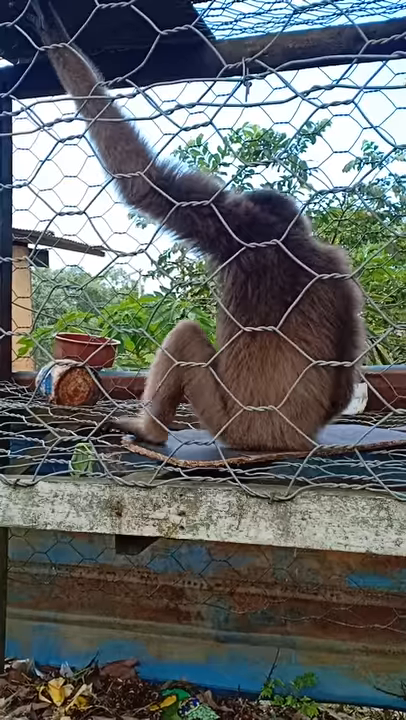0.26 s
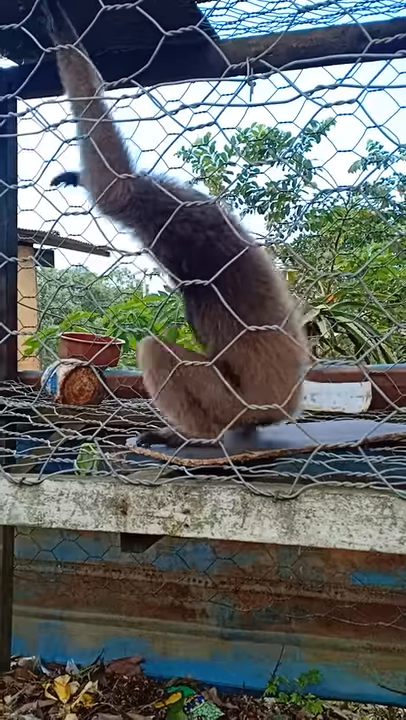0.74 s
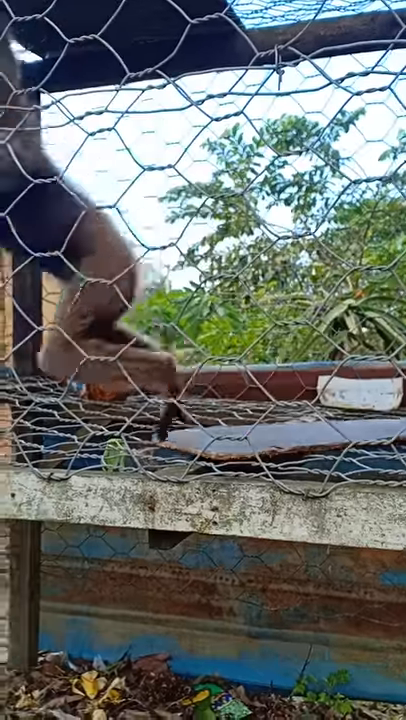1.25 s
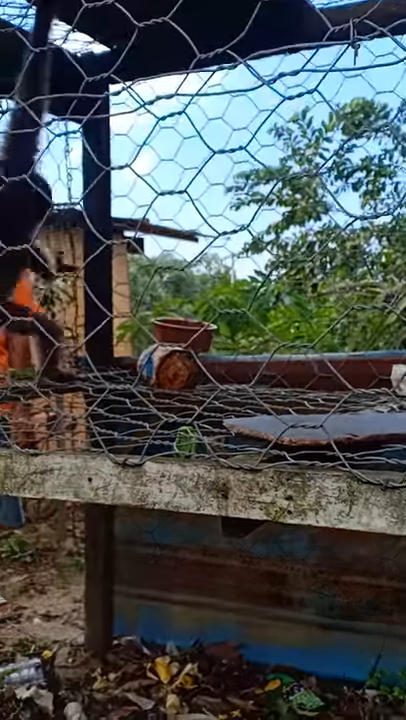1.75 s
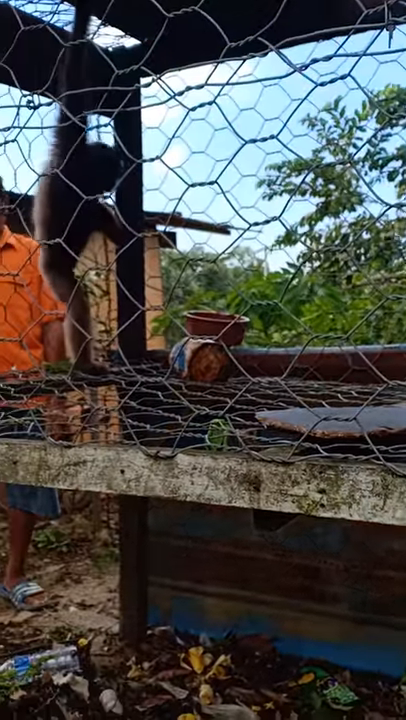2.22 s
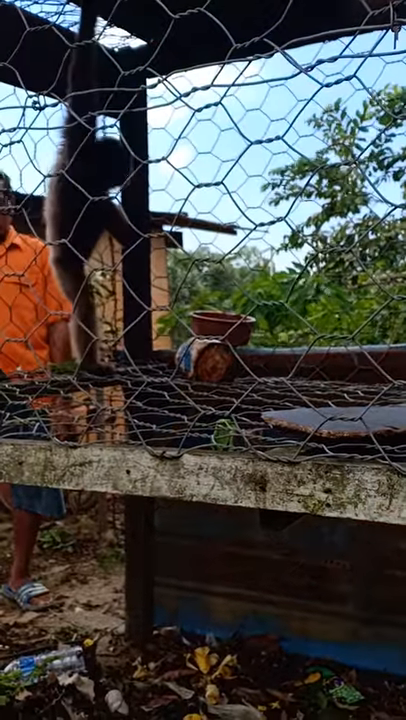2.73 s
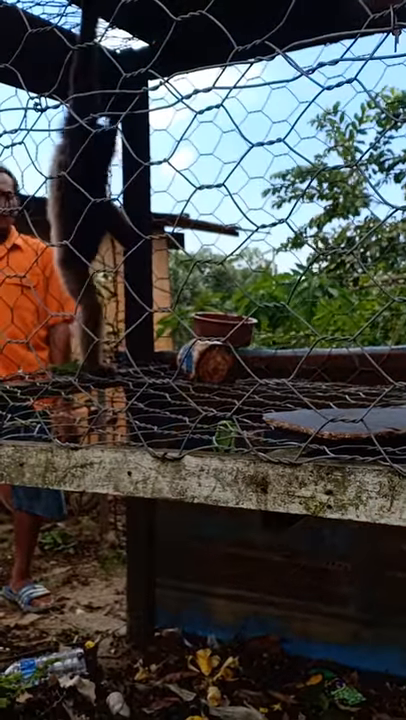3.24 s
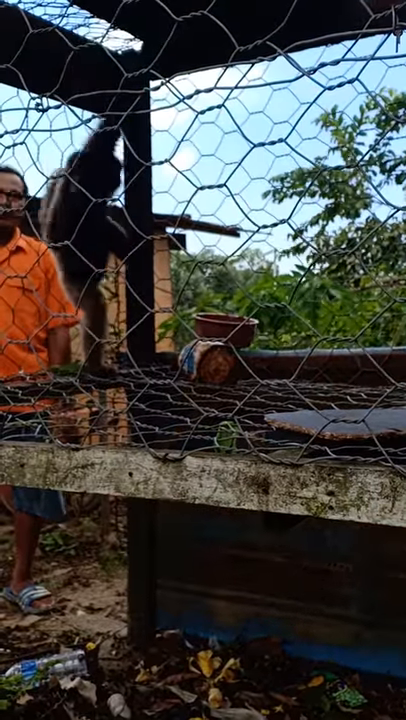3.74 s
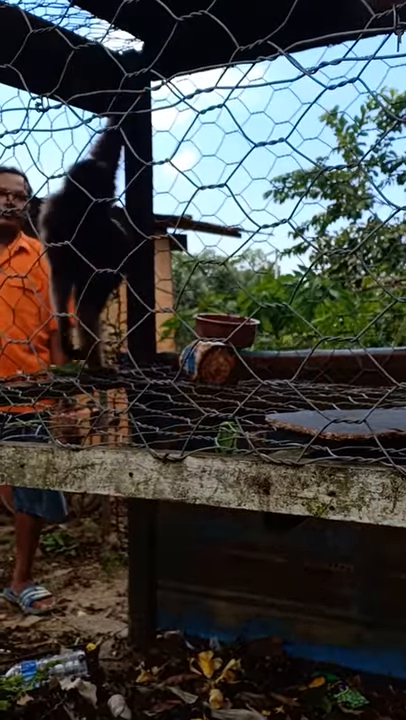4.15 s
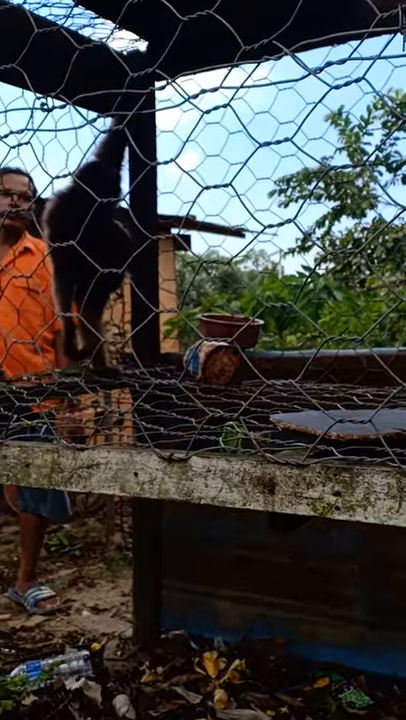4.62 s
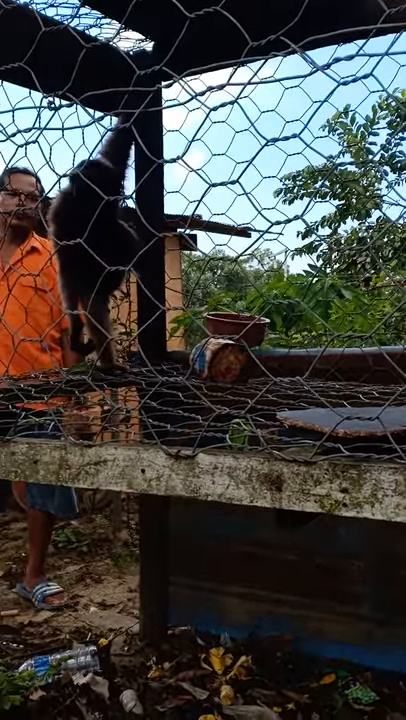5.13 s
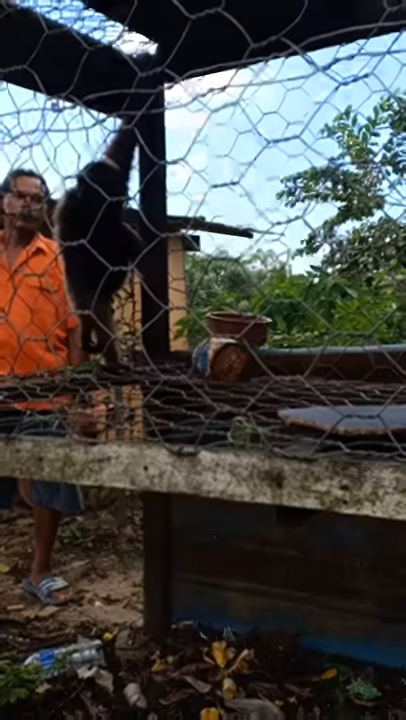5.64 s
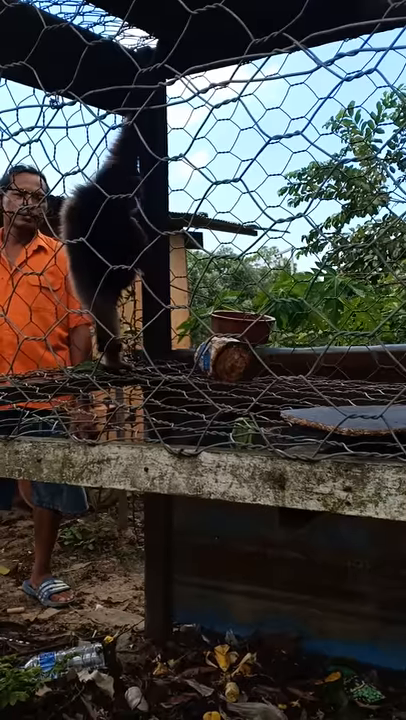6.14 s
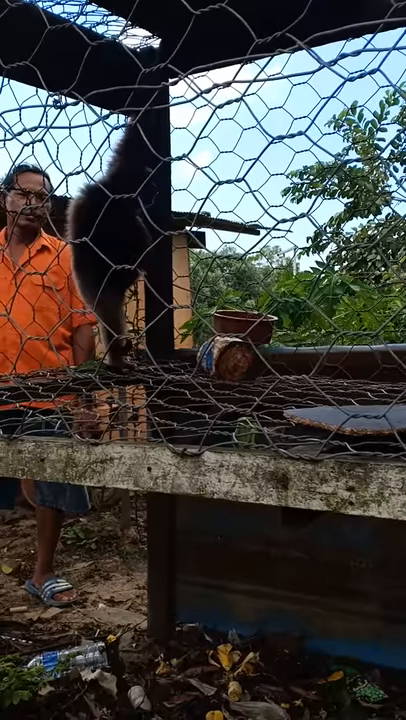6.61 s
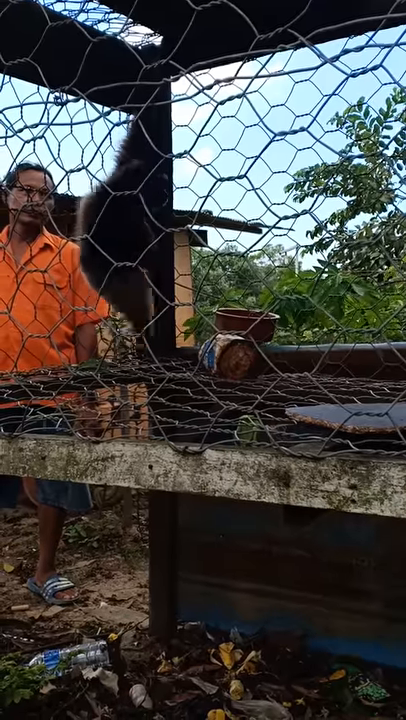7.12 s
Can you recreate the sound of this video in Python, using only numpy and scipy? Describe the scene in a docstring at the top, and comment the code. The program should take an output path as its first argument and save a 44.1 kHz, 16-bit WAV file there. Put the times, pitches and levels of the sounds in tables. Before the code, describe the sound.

A steady high insect drone, around five kilohertz, hisses with small rasps from the start, over very faint low rumble and open air. Wire mesh ticks sharply from 0.1 s. At about 0.4 s a nearby gibbon gives a loud, nearly pure, slightly airy whoop, gliding up from roughly 600 to 900 hertz in a tenth of a second, then breaking off. Similar whoops follow evenly at 1.3, 2.1, 2.8, 3.5, 4.2, 5.0, 5.8, 6.5 and 7.3 s. Between 1 and 2.4 s soft rustling swells and metallic ticks cluster as it climbs; another rustle comes near 3.4 s, with a stronger insect rasp. The middle is sparer; ticks return from 5.7 s and gather around 7 s. Thin, faint bird notes, high and low, come and go. Close stereo pickup, calls slightly left, with brief shed echoes and a faint dull tail from trees.

```python
"""Insects drone and rasp high up and a wire mesh ticks; then a gibbon gives an even series of short rising whoops.
It sits in a roofed wire-mesh cage among trees; the mesh rattles as it climbs, birds whistle faintly, a rumble lies low.
The whoops are sums of harmonics plus breath noise, the ticks are struck resonators, the birds are gliding sines;
insects, steady mesh rattling, open air and the gibbon's rustling are coloured noise, with a passing sine hum.
Caller, ticks and birds ring in the yard."""
import sys
import numpy as np
from scipy import signal
from scipy.fft import rfft, irfft, next_fast_len
from scipy.io import wavfile
from scipy.ndimage import uniform_filter1d, minimum_filter1d

SR = 44100
rng = np.random.default_rng(int(sys.argv[2]) if len(sys.argv) > 2 else 0)


def waveform_to_disk(signal):
    """Save audio, clipped to [-1, 1], as 16-bit WAV at the path in sys.argv[1]."""
    frames = np.transpose(np.atleast_2d(signal))
    scaled = np.clip(frames, -1, 1) * 32767
    samples = np.round(scaled).astype(np.int16)
    wavfile.write(sys.argv[1], SR, samples)


N = 325017
TIME = np.arange(N) / SR

# Levels in the tables come before the trims named in the functions. Pan is left over right, in dB.
# Distant rumble. Each row: time in seconds, level in dB.
RUMBLE_LEVEL = [(0.0, -65), (0.66, -73.5), (1.07, -72), (2.75, -73.5), (3.27, -67.5), (3.47, -72),
                (7.07, -70.5), (7.25, -66.5)]
# Spectrum of the rumble. Each row: frequency in Hz, level in dB.
RUMBLE_SPECTRUM = [(22, -13.5), (42, 0.5), (70, 2), (100, 0.5), (125, 1.5), (160, -5.5), (260, -16.5),
                   (500, -32)]
# Soft midrange rush of the open air, swelling with the gibbon's rustling as it moves.
# Each row: time in seconds, level in dB.
AIR_AND_RUSTLE_LEVEL = [(0.0, -63), (0.32, -67.5), (0.83, -74.5), (1.19, -61), (2.06, -61), (2.77, -72.5),
                        (3.39, -64), (4.66, -73), (4.91, -71), (6.86, -74), (7.25, -70.5)]
# Spectrum of that rush and rustling. Each row: frequency in Hz, level in dB.
AIR_AND_RUSTLE_SPECTRUM = [(100, -12), (220, 4.5), (500, 4), (800, 6), (1200, -6.5), (2000, -2.5),
                           (6000, -10), (9000, -27.5), (15000, -23.5)]
# A low hum that comes and goes. Each row: start in seconds, length in seconds, frequency in Hz, level in dB.
PASSING_HUMS = [(0.86, 0.39, 125.8, -59), (2.98, 0.398, 120.8, -64)]
# Insect chorus and cage. Each row: time in seconds, level of the insect drone in dB,
# level of the mesh's faint steady rattling below the drone in dB.
DRONE_AND_RATTLING_LEVEL = [(0.0, -55, -59), (0.29, -47, -59), (0.94, -52.5, -57.5), (1.5, -48, -59),
                            (1.76, -49, -51.5), (2.26, -51, -54.5), (2.44, -53, -61), (2.91, -48, -57.5),
                            (3.4, -43, -54), (3.8, -48, -59.5), (4.62, -49.5, -59), (4.95, -47.5, -56.5),
                            (5.36, -49.5, -62), (5.75, -59.5, -60.5), (5.99, -54, -65), (6.94, -53, -60.5),
                            (7.1, -56, -63.5), (7.37, -40.5, -61)]
# Spectrum of the drone. Each row: frequency in Hz, level in dB.
DRONE_SPECTRUM = [(2240, -50), (3800, -18), (4420, -9), (4690, -7), (5320, -2), (5540, -7), (6240, -18),
                  (6450, -22.5), (6740, -23.5), (6980, -26), (9070, -53), (15400, -120)]
# Spectrum of the mesh rattling. Each row: frequency in Hz, level in dB.
RATTLING_SPECTRUM = [(1700, -13), (2100, -4.5), (2500, 3.5), (3200, -2), (4000, -2), (4700, -6),
                     (5500, -45.5), (8000, -56.5)]
# Louder rasps in the chorus. Each row: start in seconds, length in seconds, centre in Hz, level in dB.
INSECT_RASPS = [(0.07, 0.14, 5440, -41), (0.283, 0.077, 5760, -42.5), (2.628, 0.066, 5280, -40),
                (2.933, 0.19, 5550, -43), (3.243, 0.04, 5470, -35.5), (3.392, 0.073, 5520, -37.5),
                (3.45, 0.066, 5080, -29.5), (3.855, 0.126, 5360, -39), (4.796, 0.22, 5200, -42.5),
                (5.518, 0.28, 5350, -40.5), (5.692, 0.028, 5370, -45)]
# Bird notes, thin and high or far and low.
# Each row: start in seconds, length in seconds, first and last pitch in Hz, level in dB.
BIRD_NOTES = [(.05, 0.34, 1190, 1116, -60.5), (0.401, 0.52, 6580, 6460, -58), (1.14, 0.3, 6470, 6380, -52),
              (1.614, 0.34, 6660, 6850, -50.5), (2.069, 0.36, 6730, 6830, -50),
              (2.447, 0.2, 1484, 1530, -56), (3.778, 0.35, 1245, 1250, -62),
              (5.465, 0.17, 1760, 1570, -55.5), (5.686, 0.12, 1730, 1504, -59.5),
              (5.875, 0.11, 6350, 5820, -45), (6.185, 0.057, 6150, 6280, -43.5),
              (6.269, .09, 6150, 6110, -44), (6.412, .062, 1756, 1470, -57.5)]
# Louder ticks of the mesh. Each row: time in seconds, peak in dB, low wires against high in dB, pan in dB.
MESH_TICKS = [(.0803, -27.5, -25, -3.5), (.1216, -26, -9.5, -5), (0.2557, -25, -10, -4.5),
              (.6734, -31.5, -5.5, 2.5), (.823, -33, -4, -1.5), (0.8506, -31, -6.5, -5),
              (0.8768, -27.5, 13, 5), (0.9524, -29, -11, -16.5), (1.152, -26.5, -2.5, -1.5),
              (1.3444, -30.5, -5.5, -2), (1.5343, -24.5, -3.5, 1), (1.6204, -21.5, -13.5, 2),
              (1.7234, -23, -23, -4), (1.7485, -23, -11, -1.5), (1.7792, -21, -16.5, -1.5),
              (1.922, -24.5, -2.5, 4), (1.985, -26.5, -22.5, 1.5), (2.2793, -27.5, -10.5, 1),
              (2.382, -25, -21, 0), (2.6427, -28, -17.5, -3.5), (3.2493, -22, -24.5, 3),
              (5.6845, -32.5, -29, 9), (5.9774, -28, -21.5, -1), (6.1932, -27.5, -21.5, -0.5),
              (6.294, -30, -8.5, -3.5), (6.412, -25.5, -24, 7.5), (6.8678, -26, -15.5, 1.5),
              (6.9135, -21.5, -17, 0.5), (7.0694, -25, -13, 2), (7.1065, -28.5, -29, -7),
              (7.1433, -28, -20, 3)]
# Modes the mesh rings with. Each row: nominal frequency in Hz, level in dB, time to fall 60 dB in seconds.
WIRE_MODES = [(2790, -4.5, 0.045), (3220, -7, 0.15), (3545, -3.5, 0.11), (3984, 1.5, 0.036),
              (4683, -5.5, 0.021), (4574, -7.5, 0.045), (5120, 2, 0.032), (5592, -0.5, 0.017),
              (5370, -11.5, 0.0049), (6300, -3, .012), (6930, -6.5, 0.012)]
# The whoops. Each row: start in seconds, rise in seconds, crest held in seconds, first pitch in Hz,
# pitch at the top of the glide in Hz, level in dB, attack in seconds, fade into the crest in seconds,
# depth of that fade in dB, mouth resonance in Hz, third harmonic there in dB, pan in dB.
GIBBON_WHOOPS = [(0.393, 0.11, 0.014, 604.7, 855.7, -7, .019, .014, 7.5, 2537, -7.5, 3),
                 (1.316, 0.11, 0.0025, 669, 882.7, -11, 0.015, 0.013, 5, 2504, -8, 5.1),
                 (2.089, 0.095, 0.017, 589.3, 926.4, -10, 0.016, 0.013, 13, 2497, -11, 3.5),
                 (2.796, .1, 0.0073, 607.3, 921, -10.5, .018, 0.012, 4.5, 2450, -11, 4.5),
                 (3.483, 0.11, 0.0047, 581, 885, -8.5, 0.03, 0.01, 11, 2413, -12, 7.5),
                 (4.188, 0.11, 0.0022, 618, 873, -9, .021, 0.0084, 8.5, 2373, -6, 3.5),
                 (4.961, .12, .002, 611, 872.4, -9.5, 0.021, 0.011, 14.5, 2493, -11.5, 4),
                 (5.782, 0.11, 0.004, 603.3, 895, -11.5, 0.017, 0.01, 7.5, 2475, -8, 6),
                 (6.526, 0.12, 0.0018, 574, 879.4, -10.5, 0.025, 0.0079, 9.5, 2428, -6, 4),
                 (7.297, 0.12, .002, 553, 896, -9, 0.028, .06, 16.5, 2360, -7.5, 1.5)]
# The weaker overtones. Each row: frequency in Hz, level in dB against the fundamental.
THROAT_SPECTRUM = [(1200, -15.5), (1550, -36), (1800, -28), (2900, -26.5), (3500, -54), (4400, -31),
                   (5200, -39.5), (6300, -45), (7500, -63), (9000, -60), (10500, -75.5), (15000, -77.5)]
# Air rushing through the gibbon's throat. Each row: frequency in Hz, level in dB.
BREATH_SPECTRUM = [(3000, -4.5), (6500, -3.5), (8000, -9.5), (9300, -9.5), (10200, -23), (15000, -21)]
# Echoes off post, bench and roof at the left microphone. Each row: delay in seconds, level in dB.
LEFT_REFLECTIONS = [(.003497, -10.5), (.011538, -10), (.015329, -18.5)]
# The same at the right microphone. Each row: delay in seconds, level in dB.
RIGHT_REFLECTIONS = [(.005997, -14), (.010956, -7.5), (.035558, -13.5)]

SNAP_S = 0.0018                     # decay constant of a tick's first scrape
RATTLE_DB, RATTLE_S = -14, 0.035    # strength and decay constant of the rattle after it
GLIDE_BOW = 0.85                    # under 1: the rise slows towards the crest
ONSET_DB, ONSET_SHAPE = 49, 1.27    # a whoop swells from this far below its level
CREST_KICK_HZ = 32.4                # the pitch flicks up as the strained tone fades
BREAK_S, BREAK_OCTAVES, BREAK_BOW = 0.036, 1.1, 1.3    # past the crest the pitch tumbles, ever faster
RELEASE_DB_PER_S, BREAK_BRIGHT_DB = 1150.5, 12.5       # the tone dies while its overtones gain on it
MOUTH_WIDTH_HZ = 170                # of the resonance that lifts the third harmonic
THIRD_FLUTTER_DB, OVERTONE_FLUTTER_DB = 2.5, 3.5       # quick wavering of the third harmonic and the others
CUTOFF_HZ = 15500


def from_db(db):
    """Decibels to gain."""
    return 10 ** (np.asarray(db) / 20)


def rms_one(x):
    """Scale to unit rms."""
    return x / np.sqrt(np.mean(x ** 2) + 1e-20)


def in_time(rows):
    """Read each column of a curve at every sample."""
    seconds, *columns = np.transpose(rows)
    return [np.interp(TIME, seconds, column) for column in columns]


def at_hz(points, hz):
    """Read a spectrum on a log-frequency axis."""
    f, db = np.transpose(points)
    return np.interp(np.log(hz + 1), np.log(f), db)


def panned(x, pan_db):
    """Share a sound between left and right, keeping their mean."""
    left = from_db(pan_db)
    return np.array([x * left, x]) * 2 / (1 + left)


def drift(rate, size=N, count=2000):
    """Random values of spread 1, so many a second, joined by straight lines."""
    return np.interp(np.arange(size) / SR * rate, np.arange(count), rng.standard_normal(count), period=count)


def noise(colour, alike):
    """Stereo noise of a given spectrum; alike is the left-right correlation, and the shared part has rms 1."""
    size = next_fast_len(N, True)
    hz = np.fft.rfftfreq(size, 1 / SR)
    in_range = (hz > colour[0][0] / 2) * (hz < colour[-1][0] * 2)
    gain = from_db(at_hz(colour, hz)) * in_range
    mid, side = irfft(rfft(rng.standard_normal((2, size))) * gain, size)[:, :N]
    alike = np.clip(alike, 0, 1)
    side_gain = np.sqrt((1 - alike) / (1 + alike))
    return (mid + side_gain * side * [[1], [-1]]) / mid.std()


def band(x, hz, width_hz):
    """Keep a band around a centre."""
    edges = [hz - width_hz / 2, hz + width_hz / 2]
    return signal.sosfilt(signal.butter(2, edges, "band", fs=SR, output="sos"), x)


def add(out, start, x):
    """Mix a stereo sound in at a time in seconds."""
    i = max(int(start * SR), 0)
    out[:, i:i + x.shape[1]] += x[:, :max(N - i, 0)]


def swell(t, length, edge):
    """Soft ends around a plateau; a sound shorter than two edges stays below full height."""
    return np.sin(np.pi / 2 * np.clip(np.minimum(t, length - t) / edge, 0, 1))


def ring(blows, hz, t60):
    """A two-pole resonator: a unit blow sets a dying sine of about height 1 ringing."""
    r, w = from_db(-60 / (t60 * SR)), 2 * np.pi * hz / SR
    return signal.lfilter([0, np.sin(w)], [1, -2 * r * np.cos(w), r * r], blows)


def air_and_rustle(rumble_db=3, middle_db=5, lumps_db=5.5):
    """Distant rumble, and open air swelling with the gibbon's rustling, as noise; a passing sine hum."""
    rumble_level_db, rush_level_db = in_time(RUMBLE_LEVEL) + in_time(AIR_AND_RUSTLE_LEVEL)
    rumble, rush = noise(RUMBLE_SPECTRUM, alike=0.84), noise(AIR_AND_RUSTLE_SPECTRUM, alike=0.75)
    out = rumble * from_db(rumble_level_db + rumble_db + lumps_db * drift(7.5))
    out += rush * from_db(rush_level_db + middle_db)
    for start, length, hz, db in PASSING_HUMS:
        t = np.arange(int(length * SR)) / SR
        hum = np.sin(2 * np.pi * hz * t) * swell(t, length, 0.13)
        add(out, start, panned(hum * from_db(db), 0))
    return out * panned(np.ones(1), 1.9)


def insects(drone_db=0.0, flutter_db=1.0, pan_db=-1.0, rasp_width_hz=800,
            rasp_grain_db=-3.0, rasp_db=0.0, singer_db=5.0, count=9):
    """A far chorus blends into a hiss whose bands, groups of singers, wax and wane; nearer rasps swell out."""
    level_db, _ = in_time(DRONE_AND_RATTLING_LEVEL)
    hisses = [noise(DRONE_SPECTRUM, alike=0.2), noise(DRONE_SPECTRUM, alike=0.2)]
    pitches, chorus = np.linspace(3900, 7200, count), 0
    spacing_hz = pitches[1] - pitches[0]
    for k, hz in enumerate(pitches):
        singers = band(hisses[k % 2], hz, spacing_hz)   # neighbours use different hisses
        chorus = chorus + singers * from_db(singer_db * drift(22))
    out = chorus * from_db(level_db + drone_db + flutter_db * drift(110)) * panned(np.ones(1), pan_db)
    grain = rng.standard_normal((2, N))
    for start, length, hz, db in INSECT_RASPS:
        t = np.arange(int(length * SR)) / SR
        piece = grain[:, int(start * SR):][:, :len(t)]
        buzz = rms_one(band(band(piece, hz, rasp_width_hz), hz, 2 * rasp_width_hz))
        level = from_db(db + rasp_db + rasp_grain_db * drift(140, len(t)))
        add(out, start, buzz * swell(t, length, 0.003) * level)
    return out


def bird(waver=0.0099, flicker_db=6.0):
    """Thin, quavering notes, level or sliding: sines of unsteady pitch and level."""
    out = np.zeros((2, N))
    for start, length, first_hz, last_hz, db in BIRD_NOTES:
        t = np.arange(int(length * SR)) / SR
        hz = np.interp(t, [0, length], [first_hz, last_hz]) * (1 + waver * drift(500, len(t)))
        tone = np.sin(2 * np.pi * np.cumsum(hz) / SR) * swell(t, length, 0.15)
        level = from_db(db + flicker_db * drift(60, len(t)))
        add(out, start, panned(tone * level, -1.0))
    return out


def mesh_rattling(rattling_db=2.0, flutter_db=1.0):
    """The mesh's faint steady rattling: its many small contacts merge into a fluttering noise."""
    _, level_db = in_time(DRONE_AND_RATTLING_LEVEL)
    return noise(RATTLING_SPECTRUM, alike=0.2) * from_db(level_db + rattling_db + flutter_db * drift(120))


def mesh_ticks(contacts_per_s=4000, level_db=1.0, low_db=4, split_hz=4200, top_hz=6400):
    """A tug scrapes the wires together in a short snap; smaller contacts follow and die away."""
    out, t = np.zeros((2, N)), np.arange(SR // 10) / SR
    force = np.exp(-t / SNAP_S) + from_db(RATTLE_DB) * np.exp(-t / RATTLE_S)
    for start, db, low_wires_db, pan_db in MESH_TICKS:
        touches = (rng.random(len(t)) < contacts_per_s / SR) * force
        tick = 0
        for hz, mode_db, t60 in WIRE_MODES:
            pitch = hz * (1 + 0.02 * rng.standard_normal())   # every strand has its own tension
            gain = from_db(mode_db + (hz < split_hz) * (low_wires_db + low_db))
            tick = tick + gain * ring(touches * rng.standard_normal((2, len(t))), pitch, t60)
        tick = tick / np.abs(tick).max()
        add(out, start, tick * from_db(db + level_db) * panned(np.ones(1), pan_db))
    return signal.sosfilt(signal.butter(8, top_hz, fs=SR, output="sos"), out + 1e-18)


def whoop_shape(t, rise_s, crest_s, first_hz, top_hz, attack_s, fade_s, fade_db):
    """Pitch rises, holds and tumbles as level swells, fades, is released: Hz, dB, strain and break (0-1)."""
    past = np.maximum(t - rise_s - crest_s, 0)
    broken = past / BREAK_S
    strain = np.clip(1 + (t - rise_s) / max(fade_s, 0.01), 0, 1)   # the fade takes at least 10 ms
    glide = np.minimum(t / rise_s, 1) ** GLIDE_BOW
    hz = first_hz + (top_hz - first_hz) * glide + CREST_KICK_HZ * strain ** 2
    onset_db = -ONSET_DB * np.exp(-(t / attack_s) ** ONSET_SHAPE)
    db = onset_db - fade_db * strain - RELEASE_DB_PER_S * past
    return hz * 2 ** (-BREAK_OCTAVES * broken ** BREAK_BOW), db, strain, broken


def gibbon(softness=0.23, strain_bright_db=4, third_strain_db=3, third_break_db=14, jitter=0.00041,
           break_jitter=0.047, shimmer_db=1.04, overtone_db=-1.0, rush_db=-47, order=10):
    """An almost pure, airy rising tone; the mouth lifts its third harmonic, the pitch breaks as the folds let go."""
    out, rush = np.zeros((2, N)), noise(BREATH_SPECTRUM, alike=0.35)
    for (start, rise_s, crest_s, first_hz, top_hz, level_db, attack_s,
         fade_s, fade_db, mouth_hz, mouth_db, pan_db) in GIBBON_WHOOPS:
        t = np.arange(int((rise_s + crest_s + BREAK_S) * SR)) / SR
        hz, db, strain, broken = whoop_shape(t, rise_s, crest_s, first_hz, top_hz, attack_s, fade_s, fade_db)
        unsteady = jitter + break_jitter * np.sqrt(broken)   # slack folds beat unevenly
        phase = 2 * np.pi * np.cumsum(hz * (1 + unsteady * drift(600, len(t)))) / SR
        soft_db = softness * db * (1 - strain)   # the gentle onset is poor in overtones
        bright_db = soft_db + strain_bright_db * strain + BREAK_BRIGHT_DB * broken
        off_mouth_db = 10 * np.log10(1 + (2 * (3 * hz - mouth_hz) / MOUTH_WIDTH_HZ) ** 2)
        third_db = mouth_db - off_mouth_db + soft_db + third_strain_db * strain - third_break_db * broken
        third_db = third_db + THIRD_FLUTTER_DB * drift(76, len(t))
        voice = np.sin(phase)
        for k in range(2, order):
            if k == 3:
                partial_db = third_db
            else:
                flutter_db = OVERTONE_FLUTTER_DB * drift(83, len(t))
                partial_db = at_hz(THROAT_SPECTRUM, k * hz) + overtone_db + bright_db + flutter_db
            voice += from_db(partial_db) * np.sin(k * phase)
        level = from_db(level_db + db + shimmer_db * drift(190, len(t))) * swell(t, t[-1], 0.0013)
        breath = np.roll(rush, -int(start * SR), axis=1)[:, :len(t)]
        airy = from_db(rush_db + bright_db) * breath
        add(out, start, level * (panned(np.sqrt(2) * voice, pan_db) + airy))
    return out


def left_late(x, lag_s=0.00014):
    """The caller's sound reaches the left microphone a moment after the right."""
    return np.array([np.interp(TIME - lag_s, TIME, x[0]), x[1]])


def yard(x, shed_db=-18, shed_t60=0.24, trees_db=-28, trees_t60=1.07, first_s=0.03, trees_cut_hz=3000):
    """Close echoes, a short ring under the roof and a long dull tail from the trees, by convolution."""
    t = np.arange(SR * 3 // 2) / SR
    near, far = rng.standard_normal((2, 2, len(t))) * (t > first_s)
    near = near * from_db(-60 * t / shed_t60)
    far = far * from_db(-60 * t / trees_t60)
    far = signal.sosfilt(signal.butter(1, trees_cut_hz, fs=SR, output="sos"), far / np.linalg.norm(far[0]))
    response = from_db(shed_db) * near / np.linalg.norm(near[0]) + from_db(trees_db) * far
    for side, echoes in zip(response, (LEFT_REFLECTIONS, RIGHT_REFLECTIONS)):
        for delay, db in echoes:
            side[round(delay * SR)] += from_db(db)
    return x + signal.fftconvolve(x, response, axes=1)[:, :N]


def scene(gibbon_db=-1.1, bird_db=-2):
    """Caller, mesh ticks and birds sound in the yard, over insects, steady rattling, air and rustling."""
    near = from_db(gibbon_db) * left_late(gibbon()) + mesh_ticks() + from_db(bird_db) * bird()
    return yard(near) + insects() + mesh_rattling() + air_and_rustle()


def record(dry):
    """The highest peaks are held under full scale; then the top is cut steeply."""
    needed = np.minimum(1, 0.95 / (np.abs(dry).max(axis=0) + 1e-9))
    limiter = uniform_filter1d(minimum_filter1d(needed, size=400), size=400)
    return signal.sosfilt(signal.ellip(10, 0.1, 80, CUTOFF_HZ, fs=SR, output="sos"), dry * limiter)


dry = scene()
out = record(dry)
waveform_to_disk(out)
```